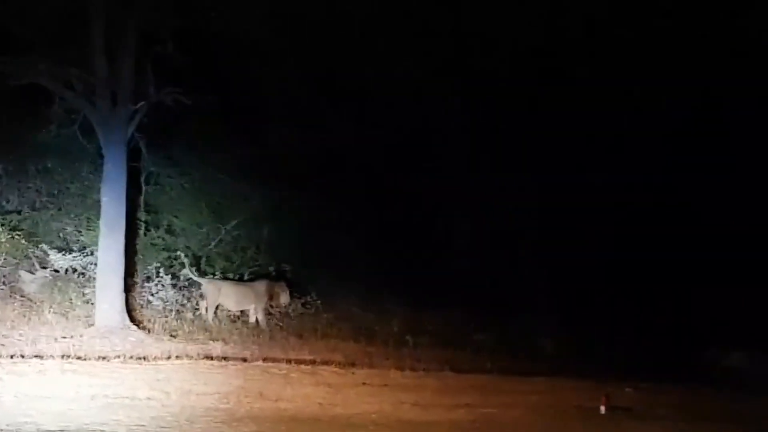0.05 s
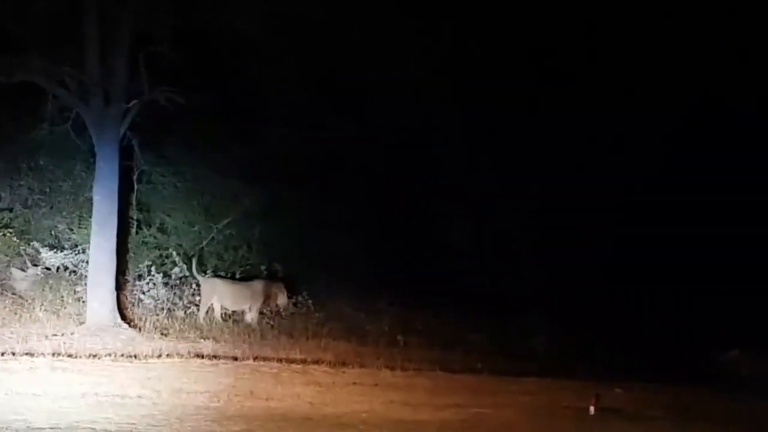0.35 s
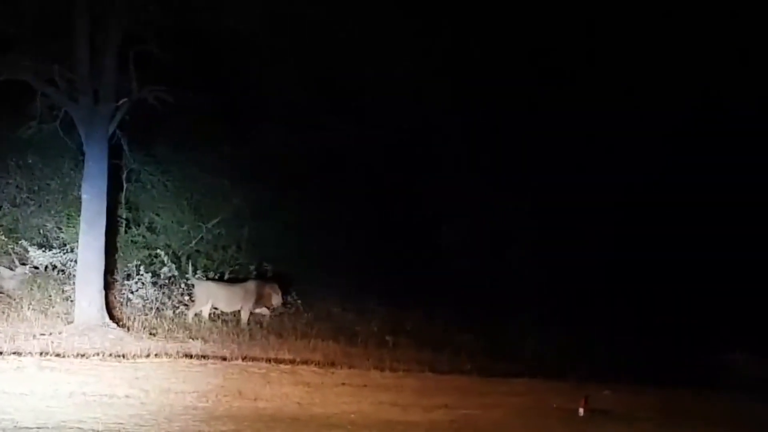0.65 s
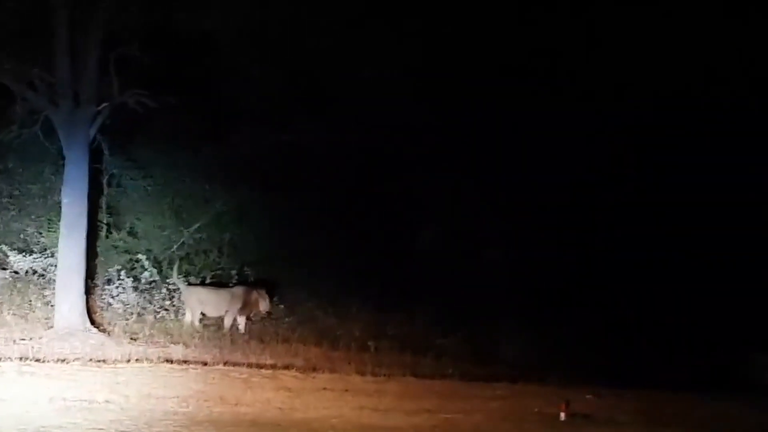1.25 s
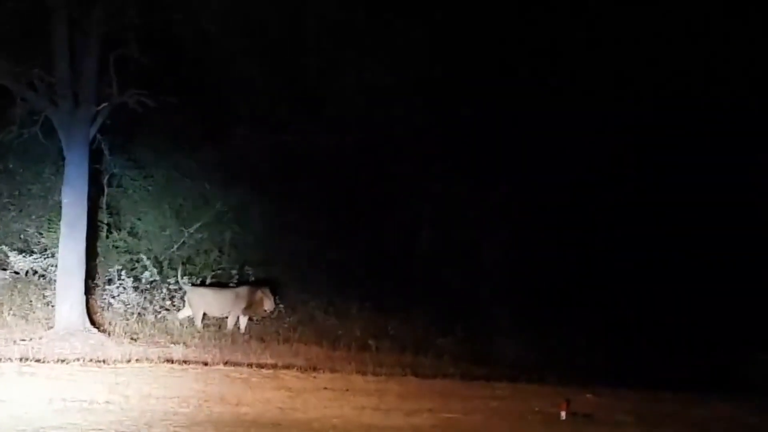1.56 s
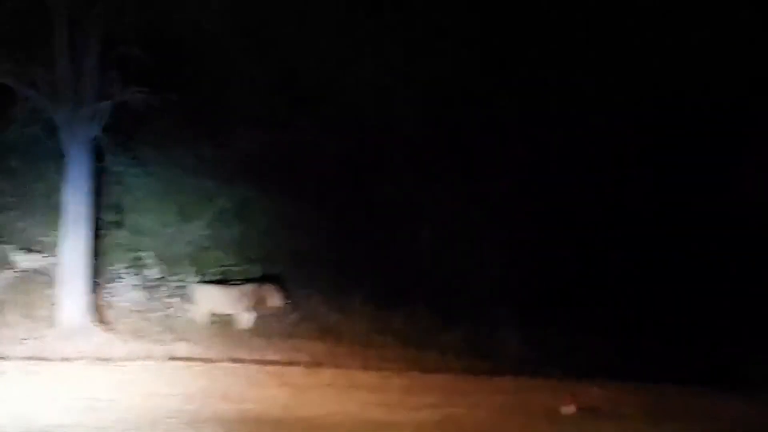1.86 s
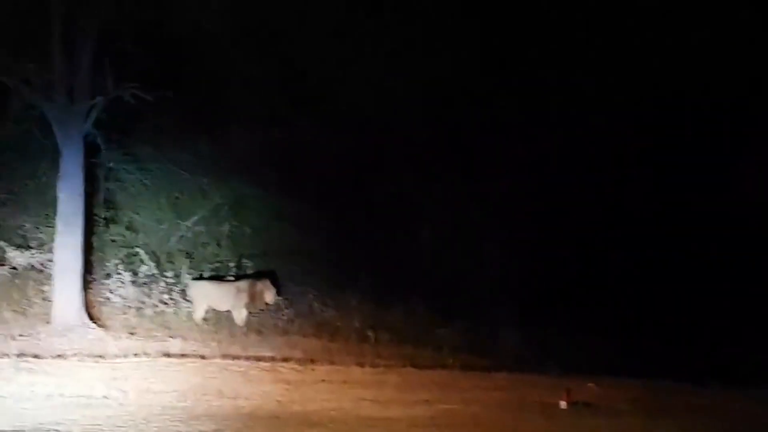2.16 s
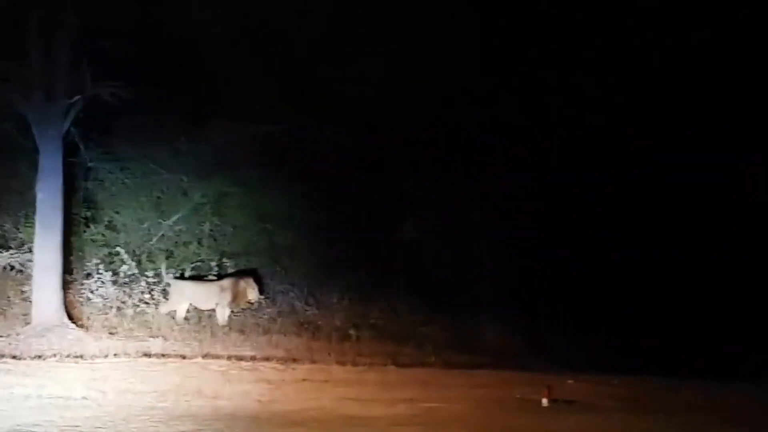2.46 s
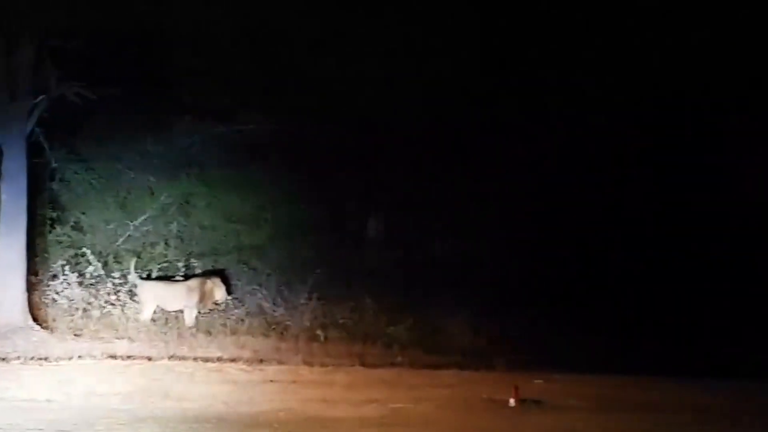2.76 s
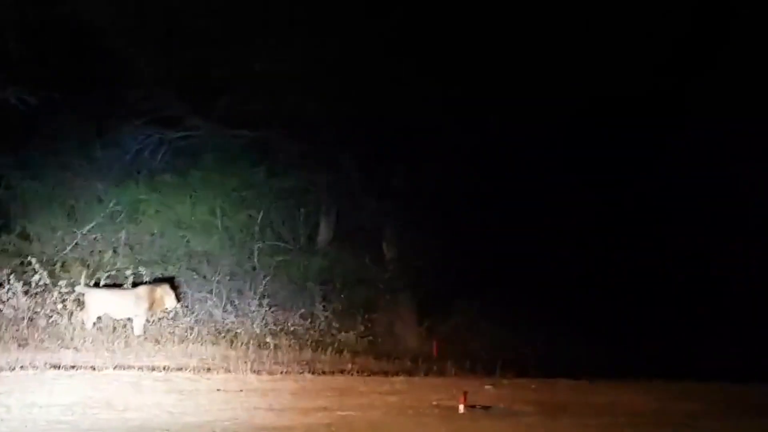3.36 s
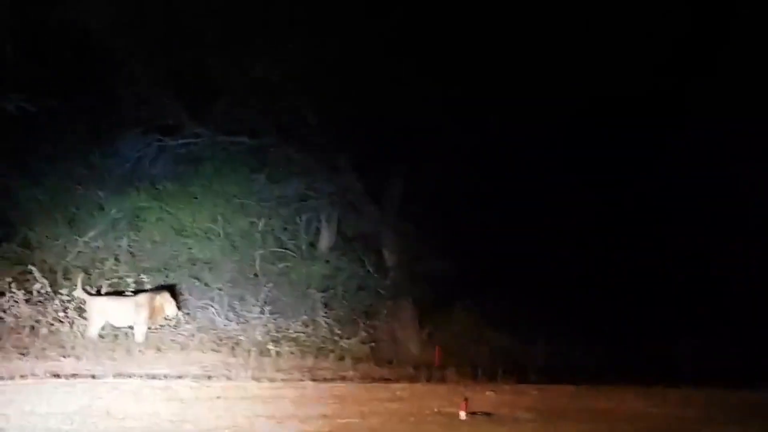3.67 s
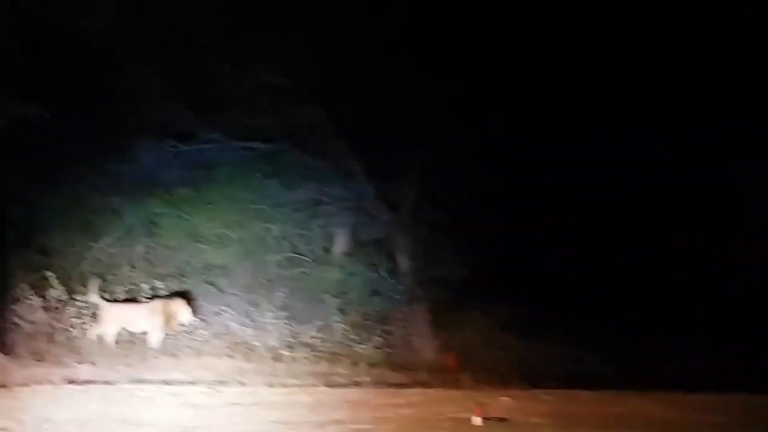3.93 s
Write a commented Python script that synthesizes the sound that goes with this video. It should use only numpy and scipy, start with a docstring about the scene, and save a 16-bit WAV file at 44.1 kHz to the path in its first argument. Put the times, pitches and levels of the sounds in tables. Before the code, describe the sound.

A long distant animal howl and shorter calls, with a vehicle idling close by.

```python
"""An animal howls some way off to the left, in the bush at night: one long, nearly pure note, then a
shorter, softer one. A second caller whoops across the first. The long howl's weak overtones swell and
fade in turn on their way through the bush. The microphone is at an idling vehicle: the firings pulse in
the exhaust, shake the body panels and drive a dull rattle, and the low throb comes up as the calls end.
Close by are faint dry rustles and ticks, over a hiss of open air."""
import sys
import numpy as np
from scipy import signal
from scipy.fft import rfft, irfft
from scipy.io import wavfile
from scipy.ndimage import uniform_filter1d

SR = 44100
rng = np.random.default_rng(int(sys.argv[2]) if len(sys.argv) > 2 else 0)


def unload_wav(signal):
    """Save mono or channel-first audio to the path in sys.argv[1] as 16-bit WAV at rate SR, clipped to [-1, 1]."""
    wavfile.write(
        sys.argv[1],
        SR,
        np.round(np.clip(np.atleast_2d(signal).T, -1, 1) * 32767).astype(np.int16),
    )


N = 176400
T = np.arange(N) / SR
BINS = np.maximum(np.fft.rfftfreq(N, 1 / SR), 1)  # Hz


def from_db(db):
    """Decibels to gain."""
    return 10 ** (np.asarray(db) / 20)


def rms_one(x):
    """Scale to unit power."""
    return x / np.sqrt(np.mean(x ** 2) + 1e-20)


def in_time(rows):
    """Each column after the time column, read at every sample."""
    seconds, *columns = np.transpose(rows)
    return [np.interp(T, seconds, column) for column in columns]


def at_hz(points, hz):
    """Read a spectrum on a log-frequency axis."""
    frequencies, values = np.transpose(points)
    return np.interp(np.log(hz), np.log(frequencies), values)


def drift(rate_hz):
    """A random wander with spread 1, mostly slower than rate_hz."""
    return rms_one(irfft(rfft(rng.standard_normal(N)) / (1 + (BINS / rate_hz) ** 2), N))


def during(rows):
    """A soft gate over the span of a curve."""
    return uniform_filter1d(1. * ((T >= rows[0][0]) & (T <= rows[-1][0])), size=600)


def noise(spectrum):
    """Steady coloured noise; rms 1."""
    return rms_one(irfft(rfft(rng.standard_normal(N)) * from_db(at_hz(spectrum, BINS)), N))


def microphone_hiss():
    """The microphone's own faint hiss, mostly alike in both channels."""
    # Each row: frequency in Hz, relative level in dB.
    spectrum = [(4000, -6), (8000, -4), (10300, -6), (11300, 0), (13000, 0), (15000, -3), (15600, -7),
                (15900, -40)]
    level_db, apart_db = -73 + .6 * drift(6), -20.5
    return from_db(level_db) * (noise(spectrum) + from_db(apart_db) * noise(spectrum) * [[1], [-1]])


def open_air(firings):
    """Wide, gently flickering noise of the engine bay and the night, pulsing a little with the firings."""
    # Each row: frequency in Hz, relative level in dB.
    spectrum = [(30, -13.5), (150, 0.5), (280, 3.5), (450, -1), (600, -5.5), (900, -7), (1300, -8),
                (1600, -12), (2600, -15), (3300, -19.5), (4000, -23.5), (5500, -30.5), (7500, -38),
                (9000, -44.5), (16000, -59.5)]
    # Each row: frequency in Hz, left-right correlation.
    likeness = [(60, -0.46), (290, 0.84), (640, 0.66), (1300, 0), (3100, 0.21), (7000, -0.5)]
    # Each row: frequency in Hz, left minus right in dB.
    balance = [(300, 0), (1300, 0.5), (2400, 0), (4400, 5.5), (7500, 23), (10000, 2.5)]
    # Each row: time in seconds, gain in dB.
    swell = [(0, 1.5), (.7, -1.3), (1.5, 0.9), (2.5, 0.9), (3.4, 0.5), (4, -0.5)]
    level_db, pulse_depth, treble_hz = -48, .15, 2000
    alike = np.clip(at_hz(likeness, BINS), -1, 1)
    pan = from_db(at_hz(balance, BINS) / 2)
    coloured = rfft(rng.standard_normal((2, N))) * from_db(at_hz(spectrum, BINS))
    mid, side = coloured * np.sqrt([1 + alike, 1 - alike])
    stereo = np.array([(mid + side) * pan, (mid - side) / pan])
    octave = np.floor(np.log2(np.maximum(BINS, 128)))
    shared_flicker, treble_db = drift(24), .7 * drift(9)
    air = 0
    for k in np.unique(octave):  # octaves flicker mostly apart; the treble also wavers as one
        flicker_db = .55 * (drift(18) + .25 * shared_flicker) + treble_db * (2 ** k > treble_hz)
        air += irfft(stereo * (octave == k), N) * from_db(flicker_db)
    pulse = 1 + pulse_depth * np.cos(2 * np.pi * firings)
    return from_db(level_db + in_time(swell)[0]) * rms_one(air * pulse)


def ticks(per_second=14, level_db=-79, spread_db=4, decay_s=.002, band_hz=(3500, 8000)):
    """Tiny dry ticks at random moments, to the left."""
    onsets = rng.random(N) < per_second / SR
    strength = from_db(spread_db * np.clip(rng.standard_normal(N), -2, 1))
    envelope = signal.lfilter([1], [1, -np.exp(-1 / (decay_s * SR))], onsets * strength + 1e-18)
    band = signal.butter(2, band_hz, "band", fs=SR, output="sos")
    bursts = signal.sosfilt(band, envelope * rng.standard_normal((2, N)))
    return from_db(level_db) * rms_one(bursts) * from_db([[3], [-3]])


def rustles(edge_ratio=1.17):
    """Brief dry rustles just left of the microphone, each in its own band."""
    # Each row: time of the peak in seconds, level in dB, centre in Hz, rise and decay time in seconds.
    events = [(.06, -61, 5500, 0.0066), (.127, -64, 3940, .012), (.268, -57, 4020, 0.0098),
              (.45, -65, 5400, 0.017), (1.99, -65, 4900, 0.024), (2.91, -63, 5900, 0.019),
              (3.52, -67, 5000, 0.045)]
    rustling = 0
    for peak_s, db, hz, decay_s in events:
        grains = rng.standard_normal((2, N)) * from_db(1.7 * drift(400))
        band = signal.butter(2, [hz / edge_ratio, hz * edge_ratio], "band", fs=SR, output="sos")
        envelope = from_db(db) * np.exp(-np.abs(T - peak_s) / decay_s)
        rustling += envelope * rms_one(signal.sosfilt(band, grains))
    return rustling * from_db([[3], [-3]])


def strike(firings, places, db, hz, t60, jitter_s, spread_db=1.5):
    """Slightly uneven, padded knocks ring one mode, at places counted in firings; rms 1."""
    times = np.interp(places, firings, T, left=-1, right=-1)
    timing, force = rng.standard_normal((len(times), 2)).T
    samples = ((times + jitter_s * timing) * SR).astype(int)
    inside = (samples >= 0) & (samples < N)
    clicks = np.full(N, 1e-18)
    clicks[samples[inside]] = from_db(db + spread_db * force)[inside]
    radius, angle = from_db(-60 / (t60 * SR)), 2 * np.pi * hz / SR
    rung = signal.lfilter([1, 0, -1], [1, -2 * radius * np.cos(angle), radius ** 2], clicks)
    padding = 1 + (BINS / (1.2 * hz)) ** 12  # mutes what lies above the mode
    return rms_one(irfft(rfft(rung) / padding, N))


def exhaust(firings):
    """Exhaust pulses: a stack of harmonics of the firing rate."""
    # Each row: multiple of the firing rate, level in dB.
    harmonics = [(1, -49.5), (2, -38.5), (3, -52.5), (4, -48.5), (5, -47.5), (6, -55.5)]
    return np.sqrt(2) * sum(from_db(db) * np.cos(2 * np.pi * k * firings) for k, db in harmonics)


def panel_boom(firings):
    """Body panels boom at each firing, every second one more weakly."""
    # Each row: mode in Hz, t60 in seconds, level in dB, lag in firings, weaker firing's gain in dB.
    panels = [(184, .11, -45, .03, -6), (171, .25, -46.5, .05, -16)]
    # Each row: time in seconds, gain within the throb in dB.
    swell = [(0, 0), (1.7, -1.5), (2.5, -2), (3.1, 1), (3.6, .5), (4, 0.5)]
    count = np.arange(int(firings[-1]) + 1)
    boom = sum(from_db(db) * strike(firings, count + lag, weak_db * (count % 2), hz, t60, jitter_s=.0002)
               for hz, t60, db, lag, weak_db in panels)
    return from_db(in_time(swell)[0]) * boom


def throb(firings):
    """The engine's low end: exhaust, panels and broad rumble come up together."""
    # Each row: frequency in Hz, relative level in dB.
    rumble = [(20, -3), (50, 15), (100, 13), (170, 15), (230, 14.5), (300, -20), (500, -47)]
    # Each row: time in seconds, gain in dB.
    swell = [(0, -13), (1.2, -14), (1.4, -10), (1.55, -4), (1.72, -0.5), (2.6, 0), (4, -2)]
    low_end = exhaust(firings) + panel_boom(firings) + from_db(-46.5) * noise(rumble)
    return from_db(in_time(swell)[0]) * low_end


def rattle(firings):
    """A dull rattle in the vehicle repeats with each four-firing cycle."""
    # Each row: place in the cycle in firings, relative level in dB.
    knocks = [(0, -4), (.85, -13), (1.75, -6), (1.98, -7), (2.53, 0), (3.0, -3), (3.52, -1)]
    # Each row: mode in Hz, t60 in seconds, level in dB.
    modes = [(350, .06, -53.5), (398, .07, -47.5), (445, .07, -53.5), (780, .03, -63)]
    # Each row: time in seconds, gain in dB.
    swell = [(0, -4), (1.7, -4.5), (2, -3.5), (2.9, -2), (3.5, -3.5), (4, -9)]
    cycles = range(0, int(firings[-1]) + 1, 4)
    places, knock_db = np.transpose([(start + place, db) for start in cycles for place, db in knocks])
    ringing = sum(from_db(db) * strike(firings, places, knock_db, hz, t60, jitter_s=.0004)
                  for hz, t60, db in modes)
    return from_db(in_time(swell)[0]) * ringing


def through_bush(calls):
    """Calls arrive from the left; trees and scrub scatter the overtones more than the fundamental."""
    # Each row: frequency in Hz, left minus right in dB.
    balance = [(340, .3), (680, 1.5), (1020, 8), (1360, 11), (1700, 5)]
    left_lead_s, shadow_hz = .0003, 600
    scatter_db, t60, delay_s, low_cut_hz = -7, 1, .017, 596
    width = BINS / np.hypot(BINS, shadow_hz)  # the bass is alike in both channels
    to_left = np.exp(1j * np.pi * BINS * left_lead_s * width) * from_db(at_hz(balance, BINS) / 2)
    direct = irfft(rfft(calls) * np.array([to_left, 1 / to_left]), N)
    tail = rng.standard_normal((2, SR)) * from_db(-60 * T[:SR] / t60) * (T[:SR] > delay_s)
    tail /= np.sqrt(np.sum(tail ** 2, axis=1, keepdims=True))
    overtones = signal.sosfilt(signal.butter(4, low_cut_hz, "high", fs=SR, output="sos"), calls)
    return direct + from_db(scatter_db) * signal.fftconvolve(overtones[None], tail, axes=1)[:, :N]


def voice(pitch, level_db, overtone_db, overtones, side_tones=(), ring_db=-np.inf, lift_hz=1, lift_db=0):
    """A strong, slightly unsteady fundamental with weak, wavering overtones."""
    # The overtones' colour. Each row: frequency in Hz, gain in dB.
    colour = [(450, -3), (600, -2.5), (695, 2.5), (880, -12), (1020, -8.5), (1150, -19.5), (1370, -19),
              (1550, -24), (1700, -10.5), (2050, -21), (2800, -31.5)]
    jitter, lift_octaves = .0027, .3
    unsteady_hz = uniform_filter1d(pitch, size=1100) * (1 + jitter * drift(24))
    phase = 2 * np.pi * np.cumsum(unsteady_hz) / SR
    tone = from_db(level_db + .35 * drift(24)) * np.sin(phase)
    tone += from_db(ring_db + 4 * drift(14)) * np.sin(10 * phase)
    for multiple, db in [(k + 2, 0) for k in range(overtones)] + list(side_tones):
        hz = multiple * pitch
        emphasis_db = lift_db * np.exp(-(np.log2(hz / lift_hz) / lift_octaves) ** 2)
        partial_db = overtone_db + db + at_hz(colour, hz) + emphasis_db + 2.2 * drift(14)
        tone += from_db(partial_db) * np.sin(multiple * phase + rng.uniform(0, 2 * np.pi))
    return np.sqrt(2) * tone


def soft_tone(curve, overtone_db=-22):
    """A gliding tone whose two overtones follow its level."""
    pitch, level_db = in_time(curve)
    return during(curve) * voice(pitch, level_db, level_db + overtone_db, overtones=2)


def lesser_calls():
    """A brief opening call, a short rise and a whoop across the long howl, and a softer howl after it."""
    # Each row: time in seconds, pitch in Hz, level in dB.
    opening = [(0, 291.7, -39), (.06, 295.4, -37.5), (.12, 318, -52.5)]
    short_rise = [(0.721, 250, -56), (0.769, 283, -45.5), (.83, 312, -44), (.87, 325, -60.5)]
    whoop = [(0.899, 236.8, -63), (0.952, 270.3, -43), (0.999, 315.1, -34), (1.056, 350.1, -31.5),
             (1.125, 402.1, -27), (1.161, 466.2, -41.5), (1.21, 500.3, -41), (1.255, 461, -42),
             (1.298, 405.7, -32.5), (1.34, 321, -42.5)]
    second_howl = [(1.43, 288, -54), (1.49, 302, -33.5), (1.54, 307, -33), (1.6, 315, -34),
                   (1.66, 324, -30.5), (1.73, 323, -33.5), (1.765, 322, -50), (1.8, 327, -47),
                   (1.9, 328, -55)]
    howl = soft_tone(second_howl, overtone_db=-23)
    return howl + sum(soft_tone(curve) for curve in (opening, short_rise, whoop))


def long_howl():
    """The main call swells, holds and drops away; its overtones swell and fade in turn through the bush."""
    # Each row: time in seconds, pitch in Hz.
    melody = [(0, 234.8), (.06, 270.3), (.1, 299.8), (.135, 302.2), (.19, 322.9), (.24, 328.9),
              (.32, 338.4), (.38, 340.2), (.47, 347.3), (.58, 341.3), (.7, 334.5), (.86, 338.5),
              (1.0, 335.5), (1.1, 333.5), (1.2, 335.1), (1.27, 331), (1.32, 332), (1.39, 316.6),
              (1.45, 282.7)]
    # Fundamental, overtones and a thin, ringing tenth harmonic. Each row: time in seconds, level in dB.
    loudness = [(0, -59.5), (.05, -42), (.1, -29), (.15, -35.5), (.23, -23.5), (0.284, -21), (.33, -28),
                (0.369, -23), (.43, -22), (.49, -26.5), (0.599, -27.5), (.8, -24), (.97, -25), (1.1, -27),
                (1.309, -27), (1.365, -32.5), (1.395, -48.5), (1.46, -36.5)]
    effort = [(0, -53.5), (.1, -48.5), (0.248, -47.5), (.38, -45), (0.501, -47.5), (0.601, -47), (.7, -53),
              (.83, -46.5), (.95, -53), (1.071, -46.5), (1.18, -49), (1.26, -53.5), (1.34, -46),
              (1.42, -49.5), (1.479, -55.5)]
    ring = [(0.419, -90.5), (0.528, -70), (.7, -70.5), (0.851, -72.5), (1.019, -74.5), (1.15, -71),
            (1.27, -86.5)]
    # A second vibration in the throat. Each row: multiple of the pitch, dB relative to the overtones.
    side_tones = [(0.451, -5), (1.539, -4)]
    # A moving band of emphasis. Each row: time in seconds, centre in Hz, lift in dB.
    emphasis = [(.05, 1120, 4.5), (.2, 1130, 15), (.34, 1330, -5.5), (.43, 1360, 9.5), (.53, 1140, 8.5),
                (.62, 1004, 9.5), (.74, 1200, 6), (.88, 1480, 10), (1.05, 990, 4), (1.17, 1010, 3.5),
                (1.3, 1450, 16.5), (1.42, 1300, -0.5)]
    # Briefly bright and rising at the onset. Each row: time in seconds, frequency in Hz, level in dB.
    third_harmonic = [(0, 702, -42.5), (.03, 732, -50.5), (0.059, 770, -49), (0.091, 816, -66)]
    pitch, level_db, overtone_db, ring_db = [in_time(c)[0] for c in (melody, loudness, effort, ring)]
    lift_hz, lift_db = in_time(emphasis)
    howl = voice(pitch, level_db, overtone_db, overtones=7, side_tones=side_tones,
                 ring_db=ring_db, lift_hz=lift_hz, lift_db=lift_db)
    return during(effort) * howl + soft_tone(third_harmonic)


def scene():
    """Distant callers, the idling engine close by and the night air all round."""
    # Engine speed. Each row: time in seconds, firings per second.
    idle = [(.2, 26.6), (.6, 27.4), (1, 28.4), (1.4, 28.5), (1.8, 27.35), (2.2, 26.65), (2.6, 26.6),
            (3, 26.3), (3.4, 26.35), (3.8, 27.1)]
    first_firing_s = .0113
    firings = np.cumsum(in_time(idle)[0]) / SR - first_firing_s * idle[0][1]  # running count
    calls = through_bush(long_howl() + lesser_calls())
    engine = throb(firings) + rattle(firings)
    return calls + engine + open_air(firings) + rustles() + ticks() + microphone_hiss()


def record(dry):
    """The top of the treble is cut steeply."""
    cutoff_hz = 15750
    return signal.sosfilt(signal.cheby2(24, 60, cutoff_hz, fs=SR, output="sos"), dry)


dry = scene()
out = record(dry)
unload_wav(out)
```